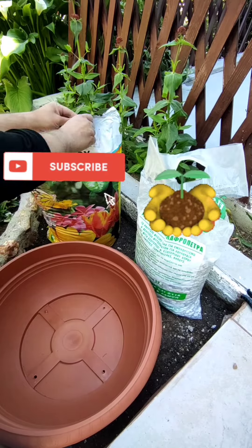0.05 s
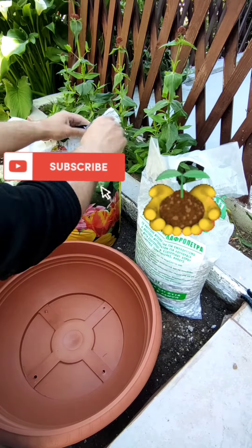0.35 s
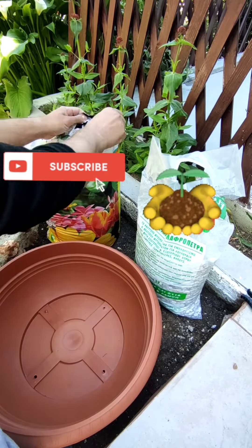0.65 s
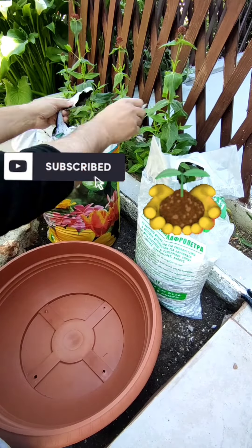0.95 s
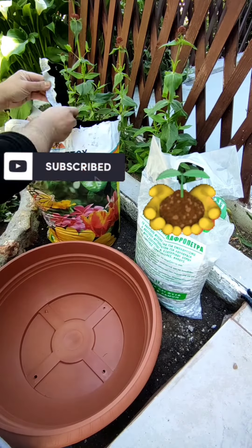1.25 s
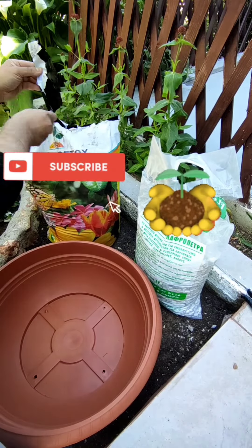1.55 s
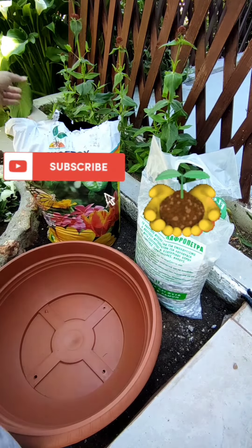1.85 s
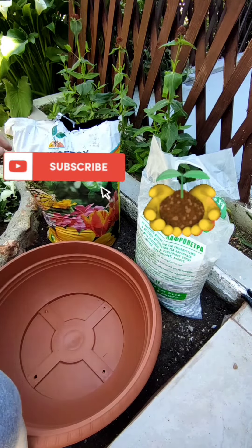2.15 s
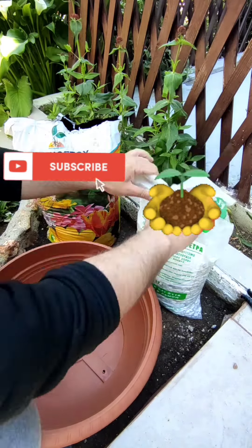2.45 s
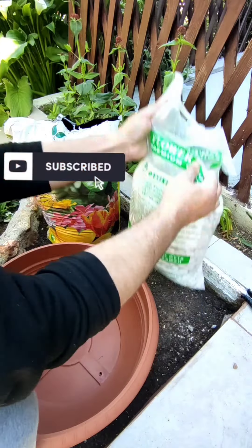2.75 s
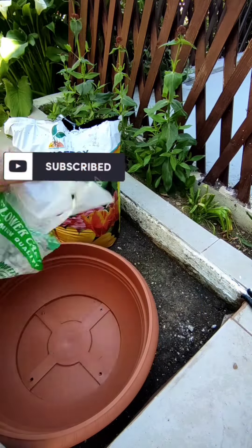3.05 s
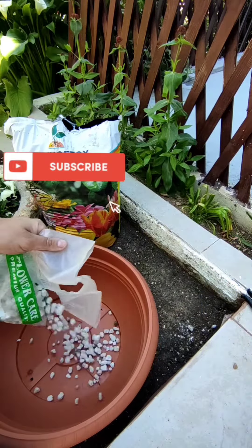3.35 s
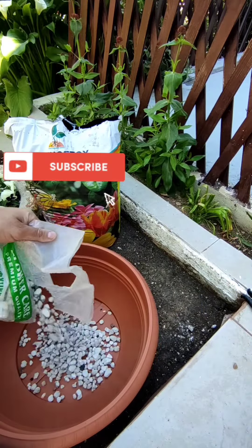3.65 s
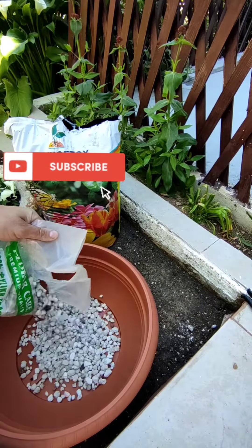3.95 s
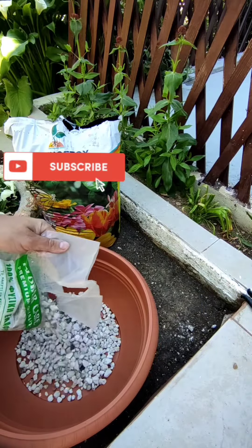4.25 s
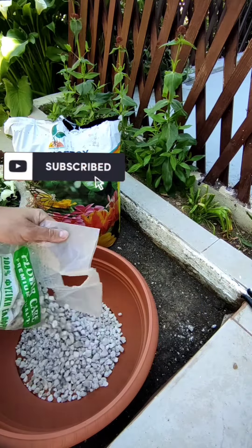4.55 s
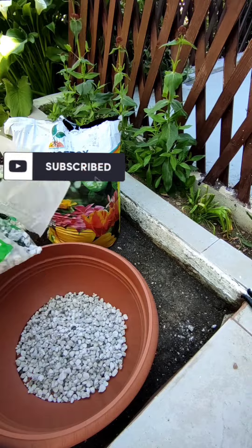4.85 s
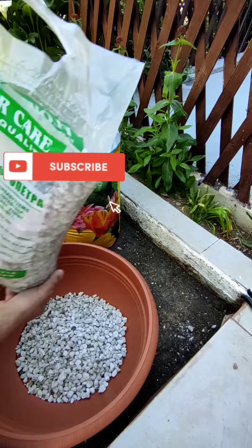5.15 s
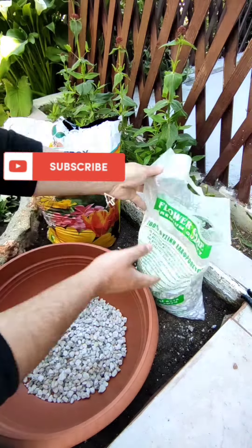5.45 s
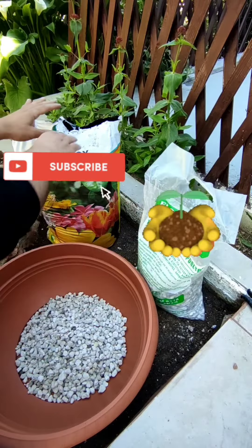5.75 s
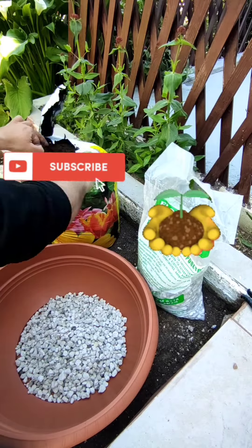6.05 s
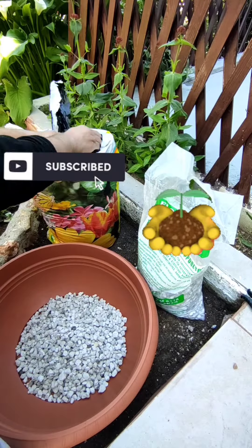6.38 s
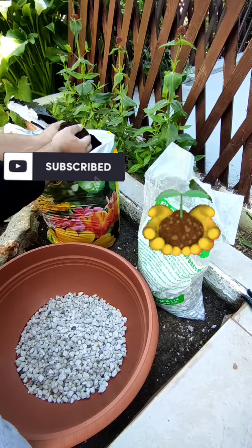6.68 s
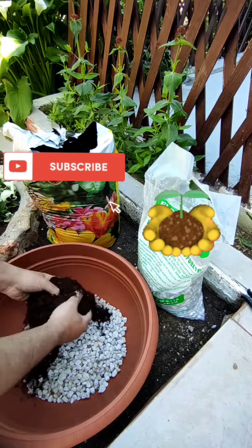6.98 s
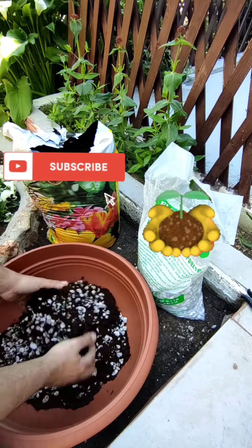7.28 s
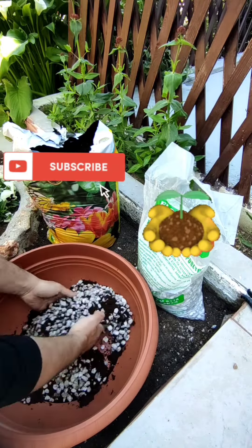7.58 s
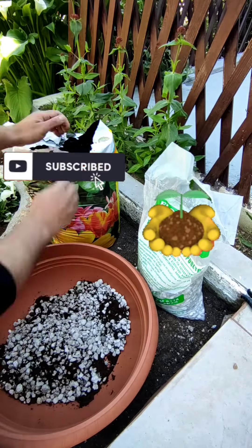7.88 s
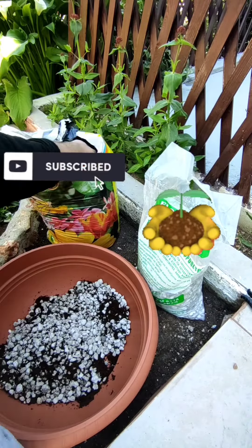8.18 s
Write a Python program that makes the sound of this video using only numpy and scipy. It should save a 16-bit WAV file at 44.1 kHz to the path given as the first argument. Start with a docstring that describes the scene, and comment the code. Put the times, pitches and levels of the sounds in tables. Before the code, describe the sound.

A heavy plastic sack is tugged open close by, crinkling, flapping and snapping in short fits for the first two seconds. From about 2.3 seconds a thinner bag of gravel is lifted with louder, brighter crackling. At about 3.1 seconds the first pebbles strike the bare base of a plastic pot with hollow knocks, and a dense, clicking pour follows. The drumming dulls as stones cover the base, and the stream thins out by 4.9 seconds. The bag rustles again and is set down with a sharp crackle and a bump near 5.4 seconds. Softer sack crinkling follows until about 6.8. Around 7 seconds soil drops onto the gravel with a thud and is stirred, the stones crunching and knocking against the pot until 7.8. A last light rustle comes near 8 seconds. A faint garden hush and a soft breeze lie underneath throughout.

```python
"""Filling a plant pot

In a small garden a plastic sack of soil is tugged open; its film crinkles, flaps and snaps. A bag of gravel is
lifted and poured into a wide plastic pot: pebbles click on each other and send bending waves through the pot's
base. The bag is set down, and a double handful of soil is dropped on the gravel and stirred in. A soft low
rumble and a few faint tones lie behind it."""
import sys
import numpy as np
from scipy import signal
from scipy.fft import rfft, irfft
from scipy.io import wavfile
from scipy.ndimage import uniform_filter1d, map_coordinates

SR = 44100
rng = np.random.default_rng(int(sys.argv[2]) if len(sys.argv) > 2 else 0)


def digitize_waveform(pressure):
    """Quantize a signal to 16-bit integers and store it at the path in sys.argv[1].

    Rows of a 2-D input are taken as channels; values are limited to [-1, 1].
    """
    field = np.atleast_2d(pressure).T
    bounded = np.clip(field, -1, 1)
    quanta = np.round(bounded * 32767).astype(np.int16)
    wavfile.write(sys.argv[1], SR, quanta)


N = 366912
TIME = np.arange(N) / SR
GRAIN_SIZE = 2048   # samples in a grain: one tiny sound, such as a click
AGE = np.arange(GRAIN_SIZE) / SR
GRAIN_HZ = np.maximum(np.arange(GRAIN_SIZE // 2 + 1), .5) * SR / GRAIN_SIZE
HOLDING_BAG = (TIME > 2.33) & (TIME < 5.5)   # the gravel bag; before and after, the soil sack

# tone of the bright crinkle of the thin gravel bag and the heavy soil sack: f/Hz, level/dB
BAG_CRINKLE = [(500, -1.5), (1100, -14), (1800, 3.5), (3000, 3), (4500, -1.5), (6500, -1), (9000, 3.5),
               (15000, -2)]
SACK_CRINKLE = [(500, 10.5), (1100, -18.5), (1800, 5.5), (3000, 4), (4500, 1.5), (6500, 1.5), (9000, 7),
                (15000, -2.5)]
# tone of their whole sheets flapping: f/Hz, level/dB
BAG_FLAP = [(40, -27), (100, -7.5), (160, -1.5), (240, 2), (350, 5), (600, -1.5), (1000, 2.5), (1600, -2),
            (3000, -35.5)]
SACK_FLAP = [(40, -17.5), (100, -9), (160, 3), (220, 2.5), (320, -3), (550, 5.5), (1000, 0.5), (1600, -2),
             (3000, -34.5)]


def amp(db):
    """Turn decibels into a gain, the number a sound is multiplied by."""
    return 10 ** (np.asarray(db) / 20)


def held(start, end, attack_s, release_s):
    """Gain that rises up to the start, stays at 1 and dies after the end."""
    outside = np.maximum((start - TIME) / attack_s, (TIME - end) / release_s)
    return np.exp(-np.clip(outside, 0, 30))


def swell(t, length_s, fall_to_rise=1, roundness=2):
    """Gain that swells to 1 at time t and dies again."""
    away = np.maximum(t - TIME, (TIME - t) / fall_to_rise) / length_s
    return np.exp(-np.minimum(away ** roundness, 30))


def uneven(spread_db, per_s):
    """Gain that wanders by chance around 1."""
    steps = rng.standard_normal(GRAIN_SIZE)
    return amp(spread_db * np.interp(TIME * per_s, np.arange(len(steps)), steps))


def add(out, start, grain):
    """Mix a grain in from a given sample on."""
    out[:, start:start + grain.shape[1]] += grain[:, :N - start]


def colour(x, spectrum, keep_level=True):
    """Give a sound the tone of a table; keep_level leaves white noise as strong as it was."""
    hz, db = np.transpose(spectrum)
    gains = amp(np.interp(np.log(GRAIN_HZ), np.log(hz), db))
    cepstrum = irfft(np.log(gains))
    cepstrum *= 1 + np.sign(np.fft.fftfreq(GRAIN_SIZE))   # ring after a hit, never before it
    response = irfft(np.exp(rfft(cepstrum)))
    if keep_level:
        response = response / np.linalg.norm(response)
    return signal.fftconvolve(x, response[None], axes=1)[:, :N]


def resonance(hz, q):
    """How a thing that rings at hz answers each frequency; a higher q rings longer."""
    return 1 / (1 + 1j * q * (GRAIN_HZ / hz - hz / GRAIN_HZ))


def stereo_grain(shared, own, alike_hz=1400, treble_share=0.17):
    """Turn spectra into a grain whose bass is alike on both sides and whose treble differs."""
    alike = treble_share + (1 - treble_share) / (1 + (GRAIN_HZ / alike_hz) ** np.pi)
    grain = irfft(np.sqrt(alike) * shared + np.sqrt(1 - alike) * own)
    return grain / np.sqrt(np.sum(grain ** 2) / 2)


def tick(decay_s, pitch_hz, ring_db=5, ring_q=0.48, tail_db=-22, tail_s=0.27):
    """Film buckles or stones touch: a burst of noise that dies quickly, with a pitch of its own."""
    fade = np.exp(-AGE / decay_s) + amp(tail_db) * np.exp(-AGE / tail_s)
    burst = rfft(rng.standard_normal((3, GRAIN_SIZE)) * fade)
    burst *= 1 + amp(ring_db) * resonance(pitch_hz, ring_q)
    return stereo_grain(burst[0], burst[1:])


def ticks(decay_s, ring_db=10, ring_q=5, dulling=0):
    """A stock of ticks of different length and pitch; with dulling, the high ones ring less."""
    pitches = np.geomspace(1600, 10000, 60)
    return [tick(decay_s * amp(rng.normal(0, 3)), hz, ring_db, ring_q * (pitches[0] / hz) ** dulling)
            for hz in pitches]


def patter(grains, per_s, spread_db, even_s=0.2):
    """Grains at random moments, mostly small and a few large, with the average level evened to 1."""
    starts = np.flatnonzero(rng.random(N) < per_s / SR)
    sizes = amp(spread_db * np.minimum(rng.exponential(1, N), 4)) * rng.choice([-1, 1], N)
    picks = rng.integers(0, len(grains), N)
    out = np.zeros((2, N))
    for i in starts:
        add(out, i, sizes[i] * grains[picks[i]])
    power = np.mean(out ** 2, axis=0)
    for _ in range(2):
        power = uniform_filter1d(power, int(even_s * SR))
    return out / np.sqrt(np.abs(power) + 1e-9)


def strays(gain, level_db, spread_db, tries):
    """Chance events whose strength follows a gain, skipped where it is quiet: t/s, level/dB."""
    moments = rng.integers(0, N, tries)
    offsets_db = level_db + spread_db * rng.uniform(-2.2, 2.6, tries)
    return [(i / SR, 20 * np.log10(gain[i]) + db) for i, db in zip(moments, offsets_db) if gain[i] > 1e-4]


def air(garden_db=-73, rumble_db=-1):
    """The garden's quiet hush and a soft, low rumble."""
    # tone of the garden and of the low rumble: f/Hz, level/dB
    garden_tone = [(40, -25), (200, -1), (500, 4), (1200, -10.5), (3000, -16.5), (8000, -27.5),
                   (15000, -29)]
    rumble_tone = [(15, -2), (30, -2), (60, -2.5), (110, -7.5), (250, -9), (1000, -37)]
    # gusts while the bag is moved: t/s, length/s, level/dB
    gusts = [(3.4, 0.18, -66), (3.87, 0.068, -71), (4.38, 0.07, -58), (5.22, 0.11, -52.5)]
    noise = rng.standard_normal((2, 3, N))
    garden, low_noise = noise[:, :1] + 0.74 * noise[:, 1:]   # partly the same on both sides
    rumble_level = amp(-67.5) + sum(amp(db) * swell(t, length_s) for t, length_s, db in gusts)
    rumble = rumble_level * colour(low_noise, rumble_tone) * amp([[2], [-2]])   # stronger on the left
    return amp(garden_db) * colour(garden, garden_tone) + amp(rumble_db) * rumble


def film(x, bag_tone, sack_tone):
    """Give a sound the tone of the plastic in the hands: thin gravel bag or heavy soil sack."""
    return colour(x * HOLDING_BAG, bag_tone) + colour(x * ~HOLDING_BAG, sack_tone)


def rustle_gain():
    """How strongly the film rustles: it comes in fits while the hands hold it."""
    # grips on the sack or bag: start/s, end/s, level/dB
    grips = [(0.01, 0.27, -52), (0.337, 0.545, -59), (0.526, 1.03, -57.5), (1.775, 2.146, -65.5),
             (2.084, 2.088, -64), (2.182, 2.292, -57.5), (2.352, 2.374, -39.5), (2.436, 2.527, -41),
             (2.6, 2.823, -45), (2.859, 3.125, -39.5), (4.868, 5.339, -38.5), (5.38, 5.536, -54),
             (5.69, 6.86, -64.5), (5.814, 5.865, -43), (6.045, 6.522, -61), (7.045, 7.12, -54.5),
             (7.904, 8.208, -55.5), (8.226, 8.32, -69.5)]
    grip = sum(amp(db) * held(start, end, attack_s=0.0032, release_s=0.026) for start, end, db in grips)
    return grip * uneven(spread_db=0.94, per_s=45)


def rustle(crinkle_db=-3, flap_db=-5.5):
    """Tiny buckles run through held film, fewer in the heavy sack, and flap the whole sheet."""
    per_s = np.where(HOLDING_BAG, 1400, 600)
    buckles = rustle_gain() * patter(ticks(decay_s=.0016), per_s, spread_db=3)
    crinkle = film(buckles, BAG_CRINKLE, SACK_CRINKLE)
    flap = film(buckles, BAG_FLAP, SACK_FLAP)
    return amp(crinkle_db) * crinkle + amp(flap_db) * flap


def folds(count=26, spread_db=3):
    """Random peaks and dips in the tone of a freshly folded sheet: f/Hz, level/dB."""
    levels_db = spread_db * rng.standard_normal(count) * signal.windows.tukey(count, .2)
    return np.transpose([np.geomspace(900, 7000, count), levels_db])


def tugs(crinkle_db=-5, flap_db=-2):
    """A pull sets off a rush of buckles that swells and dies, ringing in the film's folds."""
    # pulls that crumple the film: t/s, length/s, level/dB, extra flapping/dB
    pulls = [(0.09, 0.014, -45, -5), (0.228, 0.059, -41, -2), (.602, 0.019, -35, -4),
             (0.906, 0.024, -39, -5.5), (1.111, 0.014, -41.5, -2.5), (1.299, 0.014, -32.5, -6),
             (1.388, 0.011, -32, -0.5), (1.541, 0.018, -46.5, 0), (1.688, 0.012, -29.5, -3.5),
             (1.785, 0.0095, -51, -19), (2.394, 0.01, -33, -11), (2.457, 0.0059, -31, -13),
             (2.475, 0.014, -25.5, -7.5), (2.548, 0.011, -31, -5.5), (2.644, 0.047, -23.5, -7.5),
             (2.798, 0.025, -29, -11), (2.892, 0.039, -31, -26), (3.042, 0.035, -28.5, -7),
             (4.927, 0.021, -33.5, -1.5), (4.986, 0.011, -43, -5), (5.098, 0.0095, -28.5, -27),
             (5.154, 0.016, -33.5, -23), (5.329, 0.0078, -34, 2.5), (5.367, 0.042, -26.5, -5),
             (5.868, 0.0077, -31.5, -7), (5.934, 0.019, -43.5, -5.5), (5.995, 0.019, -43, -5.5),
             (6.109, 0.038, -48, -9), (6.166, 0.0099, -46.5, -7), (6.328, 0.0093, -43.5, -8.5),
             (7.975, 0.017, -44, -5), (8.163, 0.014, -58, -13)]
    buckles = patter(ticks(decay_s=.0015), per_s=2600, spread_db=2.6, even_s=.01)
    crinkle, flap = np.zeros((2, 2, N))
    for t, length_s, db, slack_db in pulls:
        pull = swell(t, length_s, fall_to_rise=1.185, roundness=2.8)
        span = np.flatnonzero(pull > 1e-3)
        crumple = amp(db) * colour(buckles[:, span] * pull[span], folds())
        add(crinkle, span[0], crumple)
        add(flap, span[0], amp(slack_db) * crumple)
    return (amp(crinkle_db) * film(crinkle, BAG_CRINKLE, SACK_CRINKLE)
            + amp(flap_db) * film(flap, BAG_FLAP, SACK_FLAP))


def snaps(stone, crack_db=21, body_db=14):
    """Single cracks of film or stone: tight film sounds bright, slack film has more low body."""
    # the main cracks: t/s, decay/s, level/dB, tightness/dB, left minus right/dB, f/Hz
    cracks = [(0.159, 0.004, -40.0, -2, -1.0, 4390.0), (0.201, 0.0096, -26, -0.5, -1, 4140),
              (0.346, 0.0052, -34.5, -1, 0, 5070), (0.529, 0.0073, -28, -2, 0, 3370),
              (0.661, 0.0055, -30.5, -3, -2.5, 4390.0), (0.669, 0.0063, -17.5, -3, 3.5, 3570),
              (0.788, 0.0044, -38, 1.5, -4, 4200), (0.878, 0.0061, -36.0, -3, -4, 6080.0),
              (0.962, 0.0045, -43, 0.0, -1, 4200), (0.996, 0.0019, -46.5, -6.0, -2, 1970),
              (1.272, 0.0017, -45, -1, -4, 4390), (1.677, 0.0045, -37, -10, -4.0, 8910.0),
              (2.104, 0.0023, -35, 12, 5.5, 9100), (2.407, 0.004, -24.5, 1.5, -3, 6090),
              (2.477, 0.003, -23.5, 1, -5, 4950), (2.511, 0.0021, -33, -6, -4, 5420.0),
              (2.647, 0.0031, -28, 5, -14, 3420.0), (2.725, 0.0026, -30.5, 0, -1, 4000),
              (2.779, 0.0023, -31.5, 2.0, -5, 2930.0), (2.871, 0.0022, -31.5, -3, 19, 3050.0),
              (2.912, 0.0021, -29, 2, 15, 2800), (2.919, 0.0024, -26.5, 3.0, -6, 4300.0),
              (2.93, 0.0018, -29.5, 8.0, -2, 4920.0), (2.976, 0.0019, -25.5, 1, 3, 3580),
              (3.001, 0.00081, -28, 22, -1, 6190.0), (3.148, 0.0011, -37.0, 13, 6, 6950.0),
              (3.161, 0.0045, -22.5, -4, 5, 2080.0), (3.168, 0.002, -21.0, 10, 1, 3440),
              (3.196, 0.002, -29, 0, 11, 5960.0), (3.222, 0.0028, -12, 0.5, 3, 2420),
              (3.24, 0.0025, -20, 0, -1, 5700), (3.294, 0.004, -19, -1, 3.5, 2080.0),
              (3.338, 0.0051, -16.5, 7, 5.0, 2120.0), (3.399, 0.004, -26, -7, 6, 3840.0),
              (3.425, 0.0035, -19.5, -6, 1.0, 2770), (3.446, 0.0033, -28, -5, 0, 6950),
              (3.454, 0.003, -27, 0, 1, 7080), (3.472, 0.0049, -20, 7, 4, 2000.0),
              (3.566, 0.0033, -24, -3, -2, 2520.0), (3.594, 0.003, -30, 0, -2, 7300),
              (3.817, 0.0067, -21.0, 5, 0.0, 2420.0), (3.962, 0.0043, -27.0, 15.0, 4, 8580.0),
              (4.035, 0.0062, -29, 8.0, 2, 8420.0), (4.192, 0.001, -39, 7, 0, 8580),
              (4.266, 0.0018, -33, -6, -3, 8260), (4.335, 0.004, -30.0, 2.0, 0.0, 2630),
              (4.406, 0.0062, -23.5, -1.5, 2, 2120.0), (4.474, 0.0022, -30, 11, 0.0, 6560.0),
              (4.537, 0.0029, -32, 3.0, 1.0, 8060), (4.745, 0.003, -30.5, -2, -5, 3950),
              (4.817, 0.002, -31.5, 11, -4.5, 7500.0), (4.829, 0.0018, -37, -6, 2, 2040),
              (4.861, 0.003, -32.5, 6.0, -1, 7700), (5.204, 0.0022, -35, 10, -5.5, 4220.0),
              (5.229, 0.0019, -32, 3, -4, 5210.0), (5.35, 0.0026, -26, 11, -1, 2000),
              (5.357, 0.014, -13.5, -2.5, -2.5, 4560), (5.425, 0.0024, -31, -2, -4, 2040),
              (5.564, 0.0015, -41.0, -8, -0.5, 2990.0), (5.868, 0.0005, -35.5, -2.5, -9, 2000.0),
              (6.006, 0.0023, -42, 3, -6, 4650.0), (6.085, 0.001, -43.5, 2, 3, 4220.0),
              (6.111, 0.001, -44.0, 3, 5.5, 2380.0), (6.141, 0.007, -33, 7, 0.0, 2770.0),
              (6.377, 0.0011, -46, -2, 2.5, 5740.0), (6.401, 0.0018, -38, -5.5, -1, 7300),
              (6.428, 0.0015, -52, 5, 1, 6820.0), (6.517, 0.0036, -37, 4.5, 2, 4060.0),
              (6.702, 0.0014, -50, -4, -3, 5110.0), (7.098, 0.002, -35.5, -2, -3, 6190),
              (7.16, 0.004, -38, -10, -2, 2290), (7.25, 0.0034, -29.5, -5.5, 0, 3370),
              (7.304, 0.0097, -30, 19, 1, 8900), (7.72, 0.001, -38.5, 18, 1, 7650),
              (7.743, 0.0034, -42, -4, 4, 2080), (8.003, 0.0014, -29, -2, -1, 5440),
              (8.17, 0.0025, -47.5, 8, -3, 4300.0)]
    # tone of a crack in the bag and in the sack: f/Hz, level/dB
    bag_tone = [(500, -13.5), (1200, -3.5), (2200, 0), (4200, -2.5), (6500, 2.5), (9000, 5.5), (15000, -1)]
    sack_tone = [(500, -0.5), (1200, 0.5), (2200, 0.5), (4200, -0.5), (6500, 4), (9000, 7.5), (15000, -9)]
    activity = rustle_gain() + 0.15 * stone
    lesser = [(t, .0015, db, rng.normal(3, 4), rng.normal(0, 4), 4200 * amp(rng.normal(0, 3.9)))
              for t, db in strays(activity, level_db=-5, spread_db=3.5, tries=110)]
    crack, body = np.zeros((2, 2, N))
    for t, decay_s, db, tight_db, pan_db, hz in cracks + lesser:
        pan = amp([[pan_db / 2], [-pan_db / 2]])
        burst = tick(decay_s, hz, ring_db=2.5, ring_q=4, tail_db=-26, tail_s=.008)
        bright_db = 0.98 * tight_db
        tilt = [(2500, -bright_db), (7000, bright_db / 2)]
        add(crack, round(t * SR), amp(db) * pan * colour(burst, tilt)[:, :GRAIN_SIZE])
        add(body, round(t * SR), amp(db - tight_db) * tick(decay_s=0.0049, pitch_hz=5000))
    return (amp(crack_db) * film(crack, bag_tone, sack_tone)
            + amp(body_db) * film(body, BAG_FLAP, SACK_FLAP))


def rubs(q=5):
    """Fingers stick and slip on the stretched film, which groans at one pitch."""
    # finger strokes: t/s, length/s, level/dB, f/Hz
    strokes = [(0.274, 0.0034, -42.5, 980), (.615, 0.016, -47, 170), (1.121, 0.01, -49, 510),
               (1.39, 0.0064, -35.5, 800), (1.681, 0.0036, -35.5, 510), (2.638, 0.045, -37.5, 980),
               (7.909, 0.012, -51, 480), (7.936, 0.0069, -54, 475), (7.965, 0.02, -57, 470),
               (8.09, 0.032, -57, 272)]
    slips = patter(ticks(decay_s=.001), per_s=1500, spread_db=2, even_s=.01)
    out = np.zeros((2, N))
    for t, length_s, db, hz in strokes:
        press = swell(t, length_s)
        span = np.flatnonzero(press > 1e-3)
        groan = signal.lfilter(*signal.iirpeak(hz, q, fs=SR), slips[:1, span])
        groan = signal.lfilter(*signal.iirpeak(hz, q / 2, fs=SR), groan) * press[span]
        add(out, span[0], amp(db) * groan * np.linalg.norm(press) / np.linalg.norm(groan))
    return out


def far_tones(width_s=0.012, sag_per_s=5):
    """Faint, short tones in the surroundings swell, sag in pitch and fade."""
    # low tones: t/s, level/dB, f/Hz
    tones = [(.45, -53.5, 241), (1.94, -55, 225), (2.22, -59, 254), (5.665, -55, 305), (5.665, -53, 578),
             (5.705, -54, 266)]
    out = np.zeros(N)
    for t, db, hz in tones:
        since = np.clip(TIME - t, -.1, .1)
        phase = 2 * np.pi * hz * since * (1 - sag_per_s * since)
        out += amp(db) * np.exp(-(since / width_s) ** 2) * np.sin(phase)
    return out


def thumps(level_db=-3, decay_s=0.011, rise_s=0.0032):
    """A jolt swings a loaded bag or the pot's base back and forth a few times."""
    # jolts: t/s, level/dB, f/Hz
    jolts = [(0.61, -54, 164), (0.672, -28, 404), (1.288, -33.5, 160), (1.383, -27, 233),
             (1.684, -30.5, 212), (2.351, -33.5, 272), (3.023, -30.5, 290), (3.371, -18.5, 310),
             (3.465, -18, 306), (5.359, -22.5, 252), (5.868, -40, 234), (7.177, -15.5, 366),
             (7.201, -19.5, 337)]
    fade = (1 - np.exp(-AGE / rise_s)) * np.exp(-AGE / decay_s)
    fade *= np.cos(np.pi / 2 * AGE / AGE[-1])   # end in silence
    out = np.zeros((2, N))
    for t, db, hz in jolts:
        swing = fade * np.sin(2 * np.pi * hz * AGE)
        add(out, round(t * SR), amp(db + level_db) * swing[None])
    return out


def pot(x, ring_db=-2):
    """The pot's own notes ring on top of whatever hits it."""
    # the pot's notes: f/Hz, width/Hz, level/dB
    notes = [(252, 65, -3), (316.6, 46, 16), (450, 120, -6), (575, 19, -10), (873, 13, -8), (950, 71, -3),
             (1090, 24, -19.5), (1448, 92, -1.5)]
    ringing = sum(amp(db) * signal.lfilter(*signal.iirpeak(hz, hz / width, fs=SR), x)
                  for hz, width, db in notes)
    return x + amp(ring_db) * ringing


def bending_wave(hz, q=1, travel_s=.0045, rattle_db=-21, rattle_s=0.011):
    """A hit bends the pot's base; high notes travel faster, so the sound chirps downwards."""
    push = amp(rattle_db) * rng.standard_normal((3, GRAIN_SIZE)) * np.exp(-AGE / rattle_s)
    push[:, 0] += rng.choice([-1, 1], 3)   # the hit itself
    delay = np.exp(-4j * np.pi * travel_s * np.sqrt(1000 * GRAIN_HZ))   # 1000 Hz takes travel_s
    wave = rfft(push) * delay * resonance(hz, q) ** 2
    return stereo_grain(wave[0], wave[1:])


def knocks(drum, level_db=20, click_db=-14, lead_s=0.001008):
    """Larger pebbles and knuckles hit the pot: a click, then a bending wave and a short rattle."""
    # the main hits; a lone pebble is short, a cluster rattles on: t/s, level/dB, f/Hz, rattle/s
    hits = [(3.113, -25, 870, 0.0083), (3.162, -19, 1190, 0.0032), (3.21, -18.5, 840, 0.0056),
            (3.254, -23, 990, 0.01), (3.274, -15.5, 970, 0.025), (3.293, -15, 920, 0.031),
            (3.346, -15, 880, 0.017), (3.365, -16.5, 795, 0.009), (3.378, -18, 680, 0.0084),
            (3.424, -17.5, 815, 0.005), (3.447, -17, 1330, 0.012), (3.472, -19, 1370, .004),
            (3.528, -20.5, 900, 0.0062), (3.545, -24, 1150, .008), (3.578, -21, 650, 0.0069),
            (3.643, -24.5, 890, 0.005), (3.769, -29, 1070, 0.0047), (3.8, -25, 1030, .004),
            (3.817, -17.5, 992, 0.0098), (4.071, -26.5, 1100, .005), (4.126, -31.5, 980, 0.0029),
            (4.264, -25, 1300, 0.0056), (4.332, -25.5, 781, .008), (4.358, -23.5, 1100, 0.0046),
            (4.404, -22, 1060, 0.0085), (4.492, -21, 1200, 0.012), (4.537, -28, 928, 0.0082),
            (4.611, -26, 1350, 0.0073), (4.666, -19, 1130, 0.018), (4.743, -20, 1130, 0.0092),
            (4.799, -28, 1260, 0.0049), (4.815, -27, 1093, 0.0043), (4.829, -29.5, 1240, 0.0025),
            (4.861, -46, 1140, .003), (5.12, -37.5, 850, 0.0023), (6.929, -42, 1000, 0.0018),
            (6.95, -37.5, 870, 0.004), (6.978, -34.5, 1020, 0.0046), (7.009, -34.5, 960, 0.0057),
            (7.109, -34.5, 985, 0.012), (7.186, -23, 920, 0.0069), (7.25, -19.5, 980, 0.005),
            (7.373, -34, 950, .009), (7.435, -31, 840, 0.0034), (7.467, -24, 1000, 0.027),
            (7.514, -27, 945, 0.0092), (7.543, -21.5, 764, 0.014), (7.569, -37, 600, 0.005),
            (7.624, -26.5, 950, 0.011), (7.68, -34.5, 770, 0.0024), (7.744, -25.5, 940, 0.01),
            (7.759, -33, 955, 0.0023), (7.794, -38.5, 910, 0.0037)]
    lesser = [(t, db, 1010 * amp(rng.normal(0, 2.5)), .003)
              for t, db in strays(drum, level_db=-3, spread_db=2.5, tries=130)]
    out = np.zeros((2, N))
    for t, db, hz, rattle_s in hits + lesser:
        click = tick(decay_s=.0012, pitch_hz=2200, ring_db=14)
        wave = bending_wave(hz, q=1.27, rattle_db=-20, rattle_s=rattle_s)
        add(out, round((t - lead_s) * SR), amp(db + level_db) * (wave + amp(click_db) * click))
    return pot(out, ring_db=-6.5)


def gravel_motion(start_s=3.259, end_s=4.86, pour_db=-25, thinning_db_per_s=6.5):
    """Gains of clicking, drumming and thudding: the stream thins as the bag empties; shoves add more."""
    # lulls between the first spurts of stones: t/s, length/s, dip/dB
    lulls = [(3.323, 0.0078, -7), (3.39, .005, -3), (3.44, 0.0051, -7)]
    # gravel or soil slides, lands or is pushed: t/s, length/s, clicks/dB, drumming/dB, thud/dB
    shoves = [(3.168, 0.0056, -44, -21.5, -20), (3.822, 0.025, -30, -34.5, -47),
              (3.865, 0.022, -38, -34, -33), (4.312, 0.047, -42, -48, -55), (4.654, 0.11, -41.5, -41, -56),
              (6.979, 0.059, -54.5, -48, -54), (7.185, 0.043, -35, -25.5, -34.5),
              (7.294, 0.034, -39, -33, -38.5), (7.37, 0.027, -44.5, -34, -41.5),
              (7.468, 0.06, -40.5, -39.5, -43.5), (7.535, 0.034, -41.5, -29, -36.5),
              (7.626, 0.035, -40, -33.5, -45), (7.706, 0.022, -41.5, -46, -39.5),
              (7.751, 0.013, -40, -43.5, -59), (7.844, 0.027, -63.5, -79, -62)]
    stream = amp(pour_db - thinning_db_per_s * (TIME - start_s))
    stream *= held(start_s, end_s, attack_s=0.043, release_s=.1)
    stream *= amp(sum(db * swell(t, length_s) for t, length_s, db in lulls))
    covering_s = [3.2, 4.08]   # gravel covers the bare base and muffles it
    drum_db = np.interp(TIME, covering_s, [7, -6.5])
    thud_db = np.interp(TIME, covering_s, [0.5, -9.5])
    gains = stream * np.array([np.ones(N), amp(drum_db), amp(thud_db)])
    for t, length_s, *levels_db in shoves:
        gains += amp(levels_db)[:, None] * swell(t, length_s, fall_to_rise=1.26)
    clumps = uneven(spread_db=0.9, per_s=70)
    return gains * (gains > 1e-5) * clumps


def gravel(stone, drum, thud, stone_db=-2, drum_db=-5, thud_db=-4, soil_from_s=6):
    """Pebbles click together, drum on the base and thud as a mass; soil dulls the clicks."""
    # tone of clean stones, of stones in soil and of the thud: f/Hz, level/dB
    stone_tone = [(600, -13), (1200, 14.5), (1700, 4.5), (2500, 0.5), (3600, -14.5), (5000, -20), (7000, 3),
                  (9000, 10), (15000, 6.5)]
    soil_tone = [(600, -14), (1200, 18), (1700, 1), (2500, 5), (3600, -3.5), (5000, -11), (7000, -0.5),
                 (9000, 7), (15000, -2)]
    thud_tone = [(50, -55), (110, -11.5), (180, 2.5), (260, 0.5), (360, -2), (500, -1), (900, -45),
                 (2500, -6)]
    contacts = ticks(decay_s=.0018, ring_db=21, ring_q=24, dulling=1)
    clicks = stone * patter(contacts, per_s=850 * (stone > 0), spread_db=2.8, even_s=.04)
    waves = [bending_wave(hz=950 * amp(rng.normal(0, 2.64))) for _ in range(60)]
    drumming = drum * patter(waves, per_s=320 * (drum > 0), spread_db=2.8, even_s=.02)
    mass = thud * patter(ticks(decay_s=.004), per_s=500 * (thud > 0), spread_db=2.5, even_s=.03)
    base = amp(drum_db) * drumming + amp(thud_db) * colour(mass, thud_tone)
    soiled = TIME > soil_from_s
    grit = uneven(spread_db=0.5, per_s=92)   # stones stick and slip under the soil
    crunch = colour(clicks * ~soiled, stone_tone) + colour(clicks * soiled * grit, soil_tone)
    return amp(stone_db) * crunch + pot(base)


def clink(hz, decay_s=.003, tap_db=-1):
    """Two pebbles meet: a dry tap and three unrelated notes that die quickly."""
    notes_hz = hz * amp(np.array([[0], [3], [6]]) + rng.normal(0, 1, (3, 1)))   # about 1, 1.4, 2 times
    notes = np.sin(2 * np.pi * notes_hz * AGE) * np.exp(-AGE / decay_s)
    ring = rfft(rng.standard_normal((3, 3)) @ notes)
    return stereo_grain(ring[0], ring[1:]) + amp(tap_db) * tick(decay_s=.0006, pitch_hz=hz)


def clinks(stone, level_db=-9):
    """Single hard pebbles clack above the crunch, each size at its own pitch."""
    # tone of the hard pebbles: f/Hz, level/dB
    pebble_tone = [(1500, 4.5), (2800, 0.5), (4500, -4.5), (7000, -2), (9000, 2), (14000, -13.5)]
    pebbles = [clink(hz) for hz in np.geomspace(2000, 5000, 50)]
    contacts = patter(pebbles, per_s=140 * (stone > 0), spread_db=2.3, even_s=.12)
    return amp(level_db) * colour(stone * contacts, pebble_tone)


def follow_hands(x, sack_lag_ms=0.18, bag_lag_ms=0.1, pot_lag_ms=-0.16, move_s=0.067):
    """Sound reaches the nearer side first, so the left side's lag changes as the hands move."""
    # the hands are over the pot: start/s, end/s
    over_pot = [(2.95, 5.17), (6.85, 7.82)]
    lag_ms = np.where(HOLDING_BAG, bag_lag_ms, sack_lag_ms)
    for start, end in over_pot:
        lag_ms[(TIME > start) & (TIME < end)] = pot_lag_ms
    lag_samples = uniform_filter1d(lag_ms, int(move_s * SR)) * SR / 1000
    left = map_coordinates(x[0], [np.arange(N) - lag_samples], order=3)
    return np.array([left, x[1]])


def echoes(x, near_db=-14, tail_db=-20, tail_s=0.18):
    """Pot wall and paving bounce the sound back at once; fence and wall add a short, faint tail."""
    age = TIME[:SR // 2]
    response = rng.standard_normal((2, len(age))) * amp(-60 * age / tail_s) * (age > .005)
    response *= amp(tail_db) / np.linalg.norm(response, axis=1, keepdims=True)
    for side in response:
        bounces = (rng.uniform(.001, .007, 4) * SR).astype(int)
        side[bounces] += amp(near_db) / 2 * rng.choice([-1, 1], 4)
    return x + signal.fftconvolve(x, response, axes=1)[:, :N]


def scene():
    """Sack, bag, gravel and pot in the garden."""
    stone, drum, thud = gravel_motion()
    bags = rustle() + tugs() + rubs() + snaps(stone) + thumps()
    pouring = gravel(stone, drum, thud) + clinks(stone) + knocks(drum)
    return echoes(follow_hands(bags + pouring)) + air() + far_tones()


def record(dry, cutoff_hz=15500):
    """The microphone colours each side, rounds off loud peaks and cuts the highest treble."""
    # the left side hears more bass, the right more around 7.5 kHz: f/Hz, left minus right/dB
    balance = [(60, 3.5), (200, 2.5), (500, 1), (1000, 2), (2000, -0.5), (4000, 0.5), (7500, -2),
               (12000, 1)]
    # the microphone's openings ring near 7.7 kHz: f/Hz, level/dB
    microphone_tone = [(3500, 1.5), (5200, 4), (6400, 5), (7300, 10), (7900, 11), (8500, 6), (9300, -2.5),
                       (10200, -10), (12500, -8), (15500, -14.5)]
    left = colour(dry[:1], [(hz, db / 2) for hz, db in balance], keep_level=False)
    right = colour(dry[1:], [(hz, -db / 2) for hz, db in balance], keep_level=False)
    heard = colour(np.vstack([left, right]), microphone_tone, keep_level=False)
    treble_cut = signal.ellip(10, .2, 80, cutoff_hz, fs=SR, output="sos")
    return signal.sosfilt(treble_cut, np.tanh(heard))


dry = scene()
out = record(dry)
digitize_waveform(out)
```